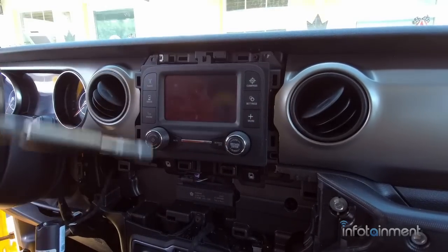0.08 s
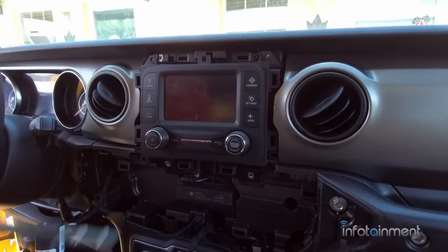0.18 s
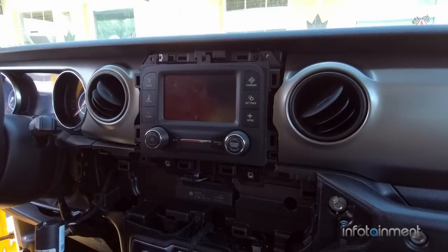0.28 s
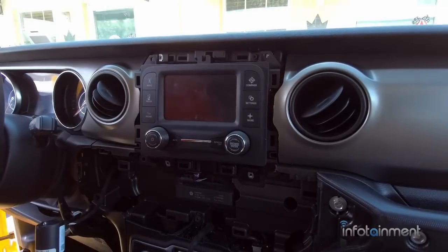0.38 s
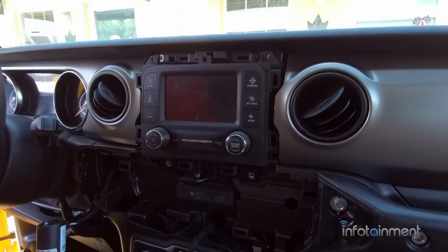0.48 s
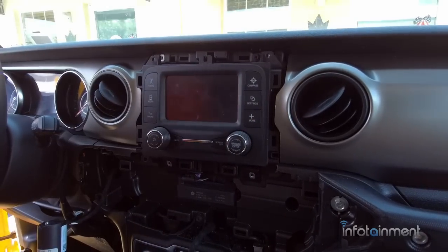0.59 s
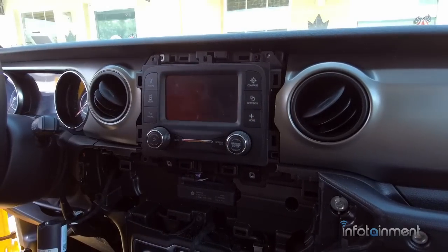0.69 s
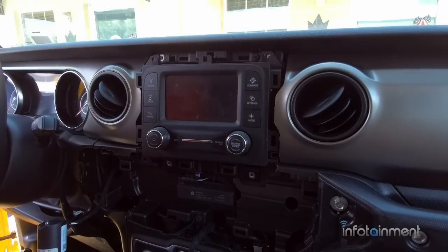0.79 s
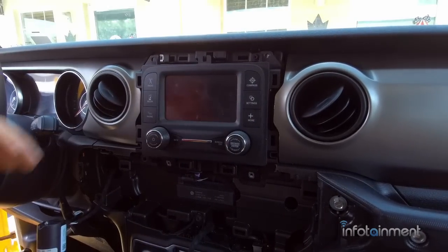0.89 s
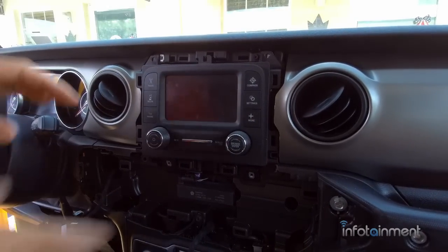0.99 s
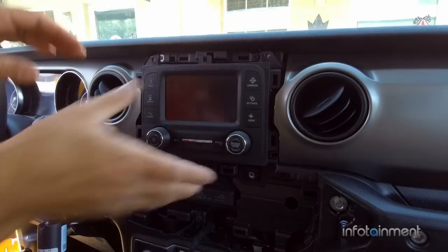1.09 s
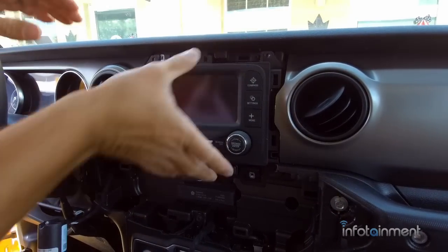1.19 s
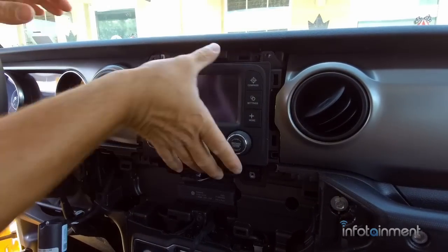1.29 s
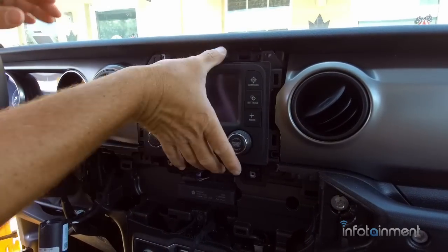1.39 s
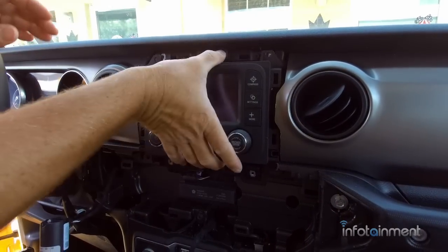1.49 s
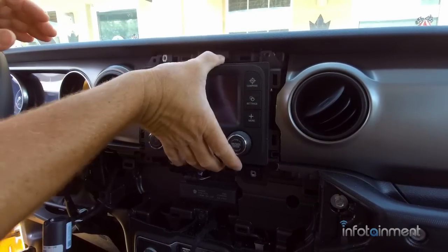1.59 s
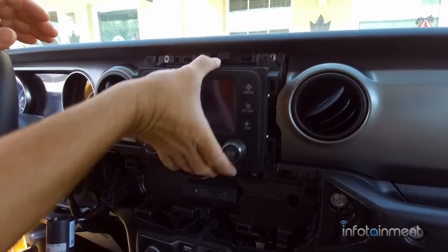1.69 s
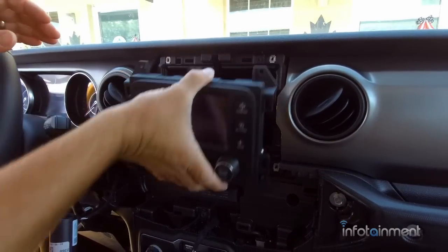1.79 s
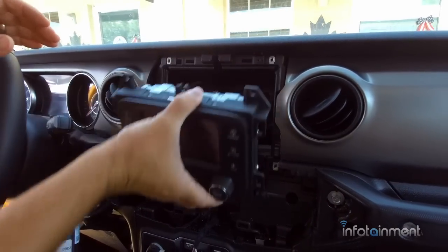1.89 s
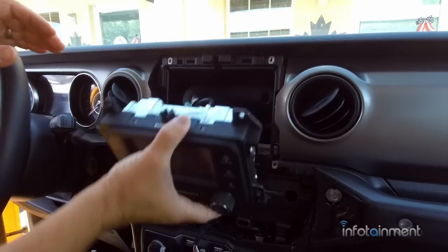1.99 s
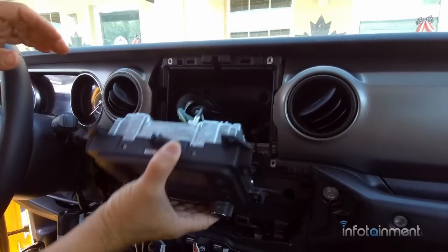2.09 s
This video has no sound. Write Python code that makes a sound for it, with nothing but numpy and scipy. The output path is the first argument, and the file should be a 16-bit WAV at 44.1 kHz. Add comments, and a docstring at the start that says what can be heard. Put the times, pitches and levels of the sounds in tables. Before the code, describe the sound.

A cordless screwdriver is dropped on a hollow plastic ledge with a loud rattling clatter, rocks to rest, then a hand brushes, trim creaks and snaps twice; close microphone in a parked car, left channel only.

```python
"""In a parked car, a cordless screwdriver is put down on a plastic dashboard ledge and rocks to rest.
Hollow swings with ringing make the knocks; bursts of noise, tiny impacts and ringing make the clacks.
A hand slides away as shaped hiss; the trim creaks and snaps with noise and quickly falling notes.
The loose radio comes out with grainy scrapes and a thin squeak. Echoes and a short tail form the cabin.
Filtered noise and wavering tones give a steady airy hum; only the left channel carries sound."""
import sys
import numpy as np
from scipy import signal
from scipy.fft import rfft, irfft
from scipy.io import wavfile

SR = 44100
rng = np.random.default_rng(int(sys.argv[2]) if len(sys.argv) > 2 else 0)


def digitize_waveform(pressure):
    """Quantize a signal to 16-bit integers and store it at the path in sys.argv[1].

    Rows of a 2-D input are taken as channels; values are limited to [-1, 1].
    """
    field = np.atleast_2d(pressure).T
    bounded = np.clip(field, -1, 1)
    quanta = np.round(bounded * 32767).astype(np.int16)
    wavfile.write(sys.argv[1], SR, quanta)


N = 92610
T = np.arange(N) / SR  # time of each sample/s


def amp(db):
    """Turns decibels into a plain gain."""
    return 10 ** (np.asarray(db) / 20)


def evened(x):
    """Scales a sound to an average strength (rms) of 1."""
    return x / np.sqrt(np.mean(x ** 2) + 1e-20)


def read(points, hz):
    """Reads a table between its points, on a logarithmic pitch axis."""
    f, value = np.transpose(points)
    return np.interp(np.log(hz + 1), np.log(f + 1), value)


def noise(colour):
    """Steady noise whose balance of low and high follows a table, with rms 1."""
    spectrum = rfft(rng.standard_normal(N))
    gain = amp(read(colour, np.fft.rfftfreq(N, 1 / SR)))
    return evened(irfft(spectrum * gain, N))


def drift(hz):
    """Random wandering with rms 1 that mostly stays slower than the given rate."""
    spectrum = rfft(rng.standard_normal(N))
    slow_only = np.exp(-(np.fft.rfftfreq(N, 1 / SR) / hz) ** 2)
    return evened(irfft(spectrum * slow_only, N))


def fall(start, life):
    """A sudden start, then a smooth decay to 1/e in one life."""
    return (T >= start) * np.exp(-abs(T - start) / life)


def causal(db):
    """Packs a spectrum into a minimum-phase pulse of energy 1, which acts as early as it can."""
    log_gain = np.log(amp(np.r_[db, db[-2:0:-1]]))
    pulse = np.fft.ifft(np.exp(np.conj(signal.hilbert(log_gain)))).real
    return pulse / np.linalg.norm(pulse)


def add(mix, s, sound):
    """Mixes a sound in at a time in seconds."""
    part = mix[max(round(s * SR), 0):][:len(sound)]
    part += sound[:len(part)]


def air():
    """A steady rush of noise, with fan tones that waver in pitch and level."""
    # colour of the rush: f/Hz, relative level/dB
    rush_colour = [(30, -36), (90, -26), (150, -12), (195, -12), (235, -12), (280, -12), (450, 1.5),
                   (600, 0.5), (1100, -3), (1500, -8.5), (1900, -10), (3400, -25), (4700, -18),
                   (6400, -34.5), (9000, -23.5), (12000, -31), (15000, -35.5)]
    # fan tones: f/Hz, level/dB
    fan_tones = [(235, -64.5), (464, -70), (544, -70), (694, -71)]
    wander_hz, waver_db = 5, 2.5
    rush_db, flutter_db = -53, 1.1
    hum = np.zeros(N)
    for hz, db in fan_tones:
        turns = np.cumsum(hz + wander_hz * drift(21.4)) / SR
        tone = np.sin(2 * np.pi * turns) * amp(waver_db * drift(2.2))
        hum += amp(db) * evened(tone)
    return hum + amp(rush_db) * noise(rush_colour) * amp(flutter_db * drift(25))


def hand():
    """Thin finger ticks on the tool and the hiss of skin sliding over plastic."""
    # light ticks of the fingers: t/s, level/dB
    touches = [(.009, -43.5), (0.064, -44.5), (0.075, -48), (0.1185, -43), (.138, -43), (0.142, -41.5)]
    # colour of a tick: f/Hz, relative level/dB
    tick_colour = [(500, -3), (3000, -5), (7000, 5), (11000, 2.5), (14500, 7.5)]
    # rise and fall of the sliding hiss: t/s, level/dB
    slide_level = [(0, -58), (.42, -57), (.452, -47.5), (.51, -53), (.6, -51), (.7, -51.5), (.765, -50.5),
                   (.805, -58), (1.0, -56), (1.2, -63), (1.42, -61), (1.52, -62), (1.72, -60), (1.87, -58),
                   (2.1, -61.5)]
    # colour of the hiss: f/Hz, relative level/dB
    slide_colour = [(120, -39), (250, 8.5), (1000, -0.5), (2300, 3.5), (4500, -1), (8000, -5), (12000, -11),
                    (15000, -9.5)]
    tick_life_s, unevenness_db = 0.0033, 0.84
    tick_level = sum(amp(db) * fall(s, tick_life_s) for s, db in touches)
    ticks = noise(tick_colour) * tick_level
    hiss_db = np.interp(T, *np.transpose(slide_level)) + unevenness_db * drift(87)
    return ticks + noise(slide_colour) * amp(hiss_db)


def rubs(moments, colour):
    """Grainy friction: noise with a fluttering level swells and dies away around each moment."""
    grain_db = 1.6
    level = sum(amp(db) * np.exp(-abs((T - s) / half) ** 1.17) for s, half, db in moments)
    return level * evened(noise(colour) * amp(grain_db * drift(540)))


def bumps():
    """Dull bumps of handling, made as short swells of mostly low noise."""
    # bumps: t of the peak/s, half length/s, level/dB
    moments = [(.011, 0.007, -31.5), (.246, 0.0027, -37), (.335, 0.024, -41)]
    # colour of a bump: f/Hz, relative level/dB
    colour = [(40, -9), (160, -64), (260, 13.5), (450, -5.5), (750, 4), (1300, -15.5), (4000, -23),
              (15000, -48)]
    return rubs(moments, colour)


def scrapes():
    """Plastic rubs on plastic in short, grainy swells of noise."""
    # scrapes: t of the peak/s, half length/s, level/dB
    moments = [(.728, 0.0046, -47.5), (.779, 0.008, -40), (.828, 0.011, -44), (.921, 0.0052, -45.5),
               (1.6, 0.02, -48.5), (1.86, 0.01, -52)]
    # colour of a scrape: f/Hz, relative level/dB
    colour = [(200, -24), (900, 9), (1200, 0), (1600, 9), (2100, 8), (3500, -1.5), (5500, -12),
              (15000, -40)]
    return rubs(moments, colour)


def squeak():
    """The radio slides out with a faint, thin tone that swells and fades and wavers slightly."""
    peak_s, half_s, hz, db = 1.84, .05, 9442, -79
    swell = np.exp(-((T - peak_s) / half_s) ** 2)
    return amp(db) * swell * np.sin(2 * np.pi * hz * T + drift(100))


def snaps():
    """Trim lets go with a crack that carries the panel's body, and a short note that drops in pitch."""
    # snaps of the trim: t/s, level/dB, f/Hz, crack level/dB
    events = [(0.7801, -30.5, 2030, -7), (0.8268, -39, 2160, -11), (0.8365, -38, 1700, -9),
              (.8884, -27, 1540, -4), (0.9112, -24, 1440, -2)]
    # colour of the crack: f/Hz, relative level/dB
    crack_colour = [(150, -15), (400, 8), (600, 3), (900, 12), (1200, -15), (3500, 1.5), (15000, -15.5)]
    rise_s, crack_life_s = 0.00093, 0.0036
    sharp_share, settle_s = 0.89, 0.00031  # the note starts sharp by this share and settles
    out, t = np.zeros(N), T[:SR // 20]
    colour = causal(read(crack_colour, np.fft.rfftfreq(2048, 1 / SR)))
    for s, db, hz, crack_db in events:
        turns = np.cumsum(hz * (1 + sharp_share * np.exp(-t / settle_s))) / SR
        note = t / rise_s * np.exp(1 - t / rise_s) * np.sin(2 * np.pi * turns)
        burst = rng.standard_normal(len(t)) * np.exp(-t / crack_life_s)
        crack = signal.fftconvolve(burst, colour)[:len(t)]
        add(out, s, amp(db) * (note + amp(crack_db) * crack / 2))
    return out


def knocks():
    """The hollow ledge swings for three or four cycles and rings on; a few echoes sound the same way."""
    # hollow knocks of the ledge and a few of their echoes: t of the peak/s, level/dB, f/Hz
    knocks_and_echoes = [(.0105, -32, 685), (0.1152, -30.5, 800), (.2051, -18, 815), (.2129, -3.3, 900),
                         (.22875, -.9, 915), (.2685, -7.3, 870), (.28245, -3.6, 945), (.2767, -14.5, 970),
                         (.298, -25, 900), (.3058, -21.5, 940), (.3223, -30, 940), (0.3453, -29.5, 860),
                         (.3627, -33, 744), (0.3964, -32, 830), (.421, -30, 830), (.4705, -36, 810),
                         (1.825, -46, 614), (1.861, -42, 613)]
    # what the dashboard rings with: f/Hz, level/dB, time to fall by 60 dB/s
    ledge_modes = [(256, -47, 0.19), (332.5, -42, 0.24), (428, -34, 0.27), (636, -28, 0.12),
                   (705, -35, 0.19), (763, -32, .15), (953, -35, 0.11), (1078, -35.5, .145)]
    swing_width_s, top_hz = 0.001, 1550
    push_db, push_hz, push_width_s = -32, 476, 0.0025
    lead_s = .005  # room for the swing to build up before its peak
    out, t = np.zeros(N), T[:SR // 3]
    u = t - lead_s
    ring = np.zeros(len(t))
    for hz, db, t60 in ledge_modes:
        ring += (u > 0) * amp(db - 60 * abs(u) / t60) * np.cos(2 * np.pi * hz * u)
    ring *= np.clip(u / 0.0036, 0, 1)  # the ringing fades in after the peak
    push = amp(push_db) * np.exp(-.5 * (u / push_width_s) ** 2) * np.sin(2 * np.pi * push_hz * u)
    for s, db, hz in knocks_and_echoes:
        swing = np.exp(-.5 * (u / swing_width_s) ** 2) * np.cos(2 * np.pi * hz * u)
        add(out, s - lead_s, amp(db) * (swing + push + ring))
    return signal.sosfiltfilt(signal.butter(6, top_hz, fs=SR, output="sos"), out)


def clacks():
    """The hard shell hits with a crack, uneven micro-impacts and a ring that differs each time."""
    # contacts of the tool's shell: t/s, level/dB, treble tilt/dB per octave, body boost/dB
    contacts = [(0.1715, -25, -11, 8), (.1764, 1.5, -2, -3), (.1893, -12, -7, 5), (.2034, 0.5, -1.5, -2),
                (0.2075, -8, -3, -2), (.2148, -5, -1.5, 3), (0.2298, 0, 1.5, 7), (0.267, -7.5, 6, 27),
                (0.276, -4.5, -2, 12), (0.2968, -18.5, 2, 8), (0.301, -12.5, -2, 3), (0.3196, -29.5, 3, 0),
                (0.3436, -19.5, -3.5, -17), (0.356, -17.5, -16, 27), (0.377, -24.5, -35, 0),
                (.3946, -19, -2.5, 14), (.4192, -15.5, -1, 7.5), (0.469, -23.5, 7.5, -8)]
    # colour of a contact: f/Hz, relative level/dB
    shell_colour = [(120, -30.5), (330, -7.5), (560, -5), (750, 2.5), (1300, -2), (1650, -3), (2000, -7),
                    (2300, 8), (3000, 3.5), (4300, -2.5), (6000, -7.5), (9000, -14.5), (15000, -17.5)]
    # what the shell rings with: f/Hz, level/dB, time to fall by 60 dB/s
    shell_modes = [(1620, -34, .045), (2320, -27, .03), (2720, -22, .012), (3010, -30, .045),
                   (3510, -33, .034), (5230, -31, .014)]
    crack_life_s, rattle_life_s = .0012, .0065
    rattle_db, rattle_per_s = -3.5, 2000
    tilt_above_hz, body_below_hz = 2500, 2100
    out, t = np.zeros(N), T[:SR // 10]
    hz = np.fft.rfftfreq(2048, 1 / SR)
    octaves_up = np.log2(np.maximum(hz / tilt_above_hz, 1))
    body_share = 1 / (1 + (hz / body_below_hz) ** 20)
    mode_hz, mode_db, t60 = np.transpose(shell_modes)[:, :, None]
    for s, db, tilt_db, body_db in contacts:
        crack = rng.standard_normal(len(t)) * np.exp(-t / crack_life_s)
        rattle = rng.standard_normal(len(t)) * np.exp(-t / rattle_life_s)
        rattle *= rng.random(len(t)) < rattle_per_s / SR  # keep only scattered impacts
        force = .8 * crack / np.linalg.norm(crack)
        force += amp(rattle_db) * rattle / np.linalg.norm(rattle)
        force[0] += .5  # the first touch
        colour = causal(read(shell_colour, hz) + tilt_db * octaves_up + body_db * body_share)
        # chance shifts in how strongly, and at what pitch, each part of the shell rings
        struck_db = mode_db + rng.uniform(-15.9, 3, mode_db.shape)
        struck_hz = mode_hz * (1 + rng.uniform(-.0128, .02, mode_hz.shape))
        ring = (amp(struck_db - 60 * t / t60) * np.sin(2 * np.pi * struck_hz * t)).sum(0)
        hit = signal.fftconvolve(force, colour)[:len(t)]
        add(out, s, amp(db) * (hit + ring))
    return out


def cabin(x, wet_db):
    """Adds a few close reflections and a short diffuse tail that dies at its own rate at each pitch."""
    # first reflections in the cabin: delay/s, level/dB
    echoes = [(.00545, -10), (.0103, -18), (.0156, -16)]
    # how long the tail lasts: f/Hz, time to fall by 60 dB/s
    tail_t60 = [(200, 0.83), (900, 0.31), (2500, 0.021), (6000, 0.053), (14000, 0.057)]
    out = x.copy()
    for delay, db in echoes:
        add(out, delay, amp(db) * x)
    hz, t, z = signal.stft(rng.standard_normal(SR // 2), SR, nperseg=128)
    fading = amp(-60 * t / read(tail_t60, hz)[:, None])
    tail = signal.istft(z * fading, SR, nperseg=128)[1]
    tail *= np.minimum(T[:len(tail)] / 0.0017, 1)  # short fade-in
    tail /= np.linalg.norm(tail)
    return out + amp(wet_db) * signal.fftconvolve(x, tail)[:N]


def scene():
    """All sources on the left channel; small plastic parts radiate little bass."""
    knock_wet_db, clack_wet_db, trim_wet_db = -24, -8, -24  # strength of the cabin's tail
    trim = snaps() + squeak() + scrapes() + bumps()
    parts = hand() + cabin(trim, trim_wet_db)
    parts += cabin(knocks(), knock_wet_db) + cabin(clacks(), clack_wet_db)
    less_bass = signal.butter(3, 170, "high", fs=SR, output="sos")
    left = signal.sosfilt(less_bass, parts) + air()
    return np.array([left, np.zeros(N)])


def record(dry):
    """Clips peaks at full scale, then removes the highest treble."""
    edge_hz = 15400
    low_pass = signal.firwin(255, edge_hz, window=("kaiser", 9), fs=SR)
    return signal.oaconvolve(np.clip(dry, -1, 1), low_pass[None], "same")


dry = scene()
out = record(dry)
digitize_waveform(out)
```